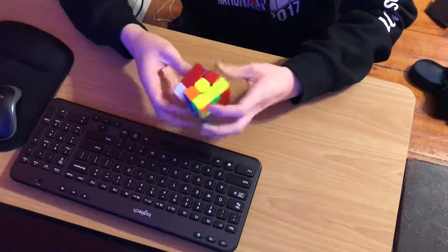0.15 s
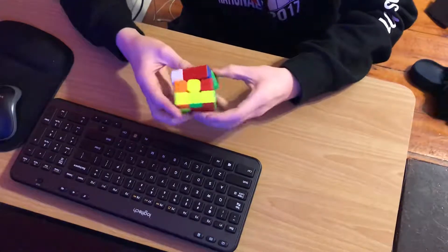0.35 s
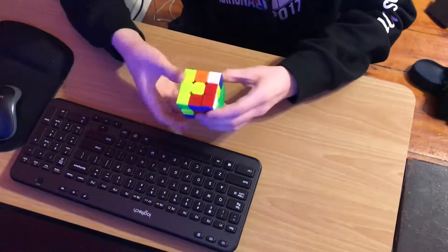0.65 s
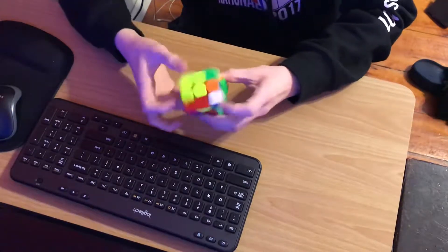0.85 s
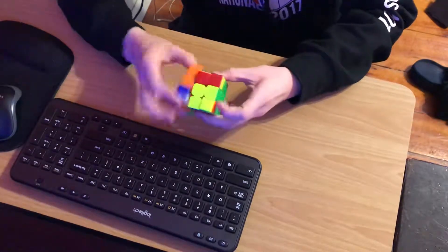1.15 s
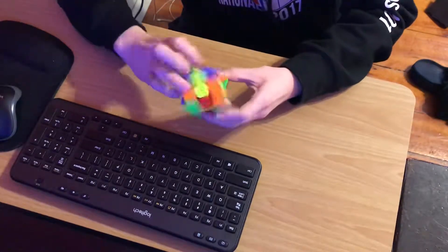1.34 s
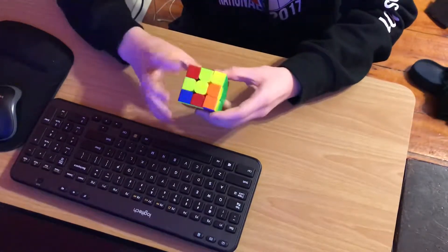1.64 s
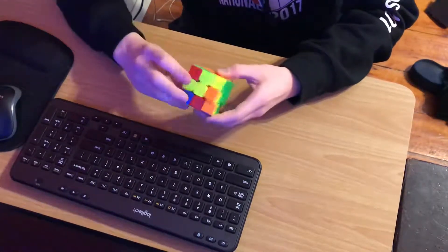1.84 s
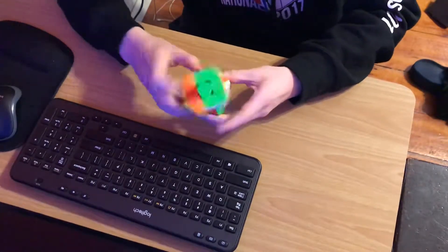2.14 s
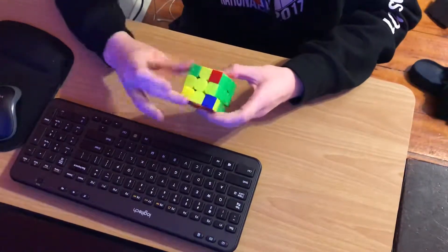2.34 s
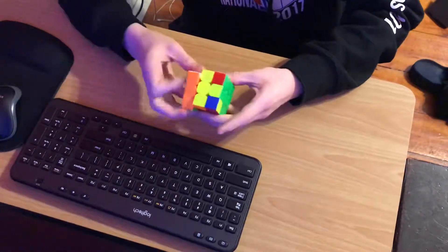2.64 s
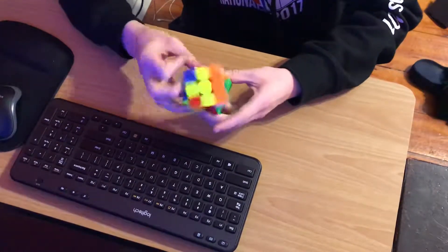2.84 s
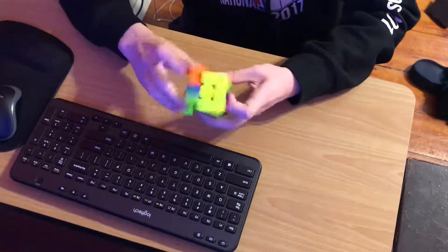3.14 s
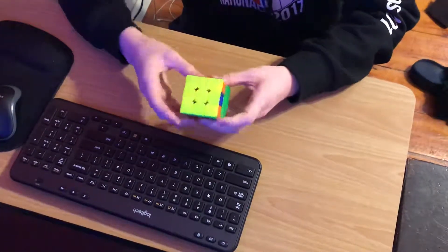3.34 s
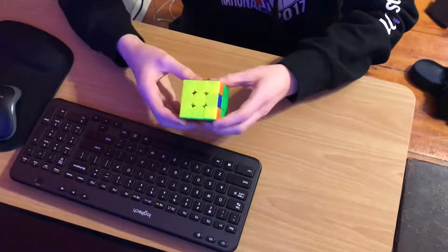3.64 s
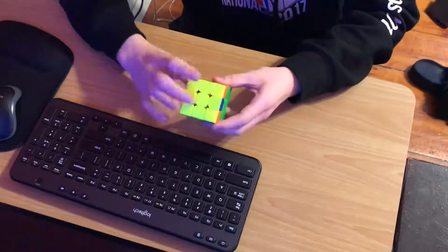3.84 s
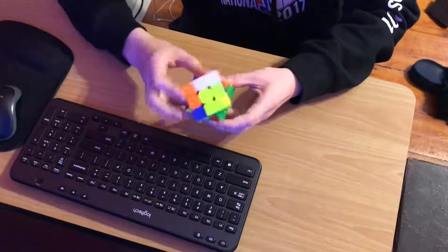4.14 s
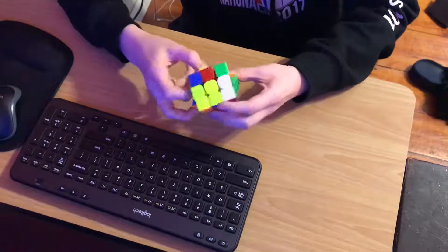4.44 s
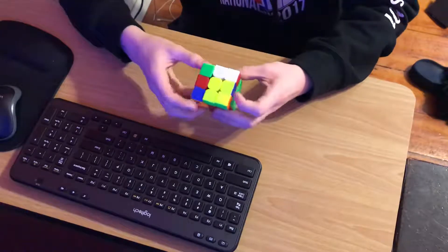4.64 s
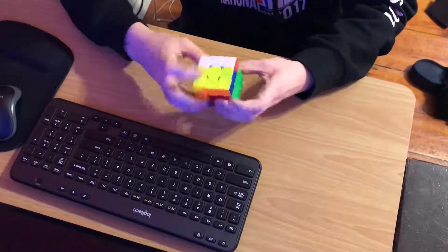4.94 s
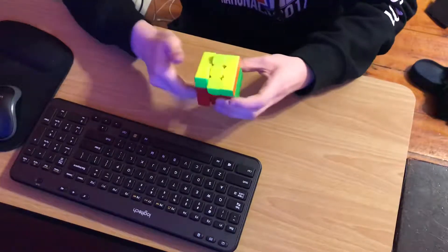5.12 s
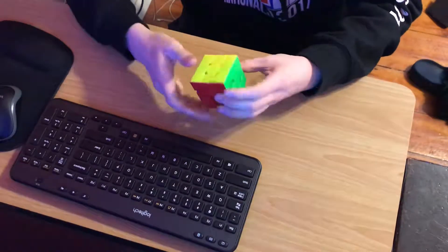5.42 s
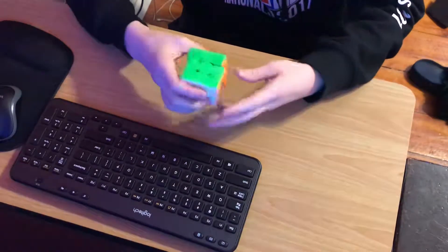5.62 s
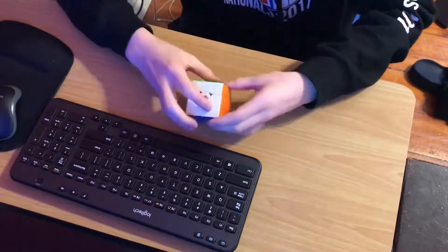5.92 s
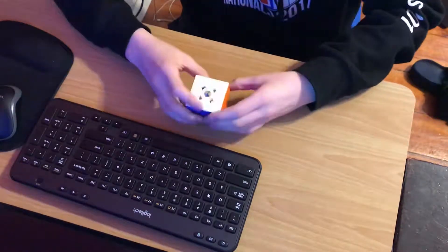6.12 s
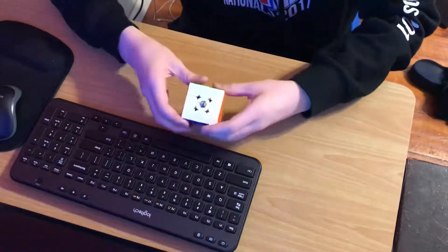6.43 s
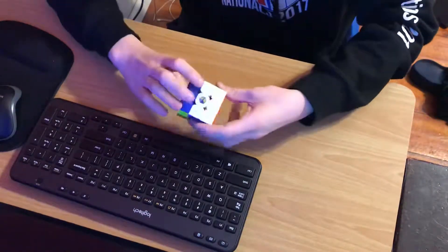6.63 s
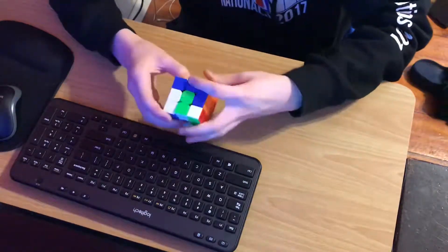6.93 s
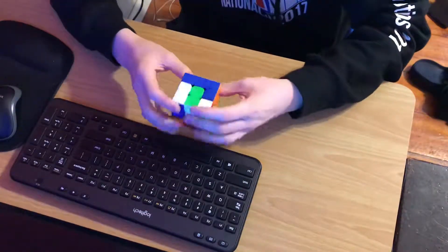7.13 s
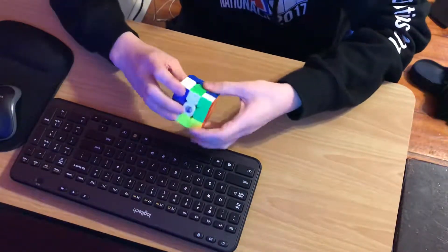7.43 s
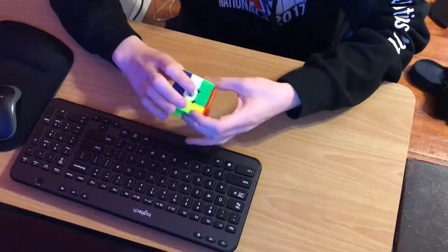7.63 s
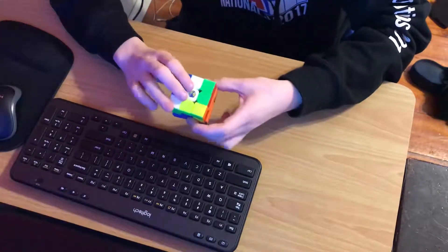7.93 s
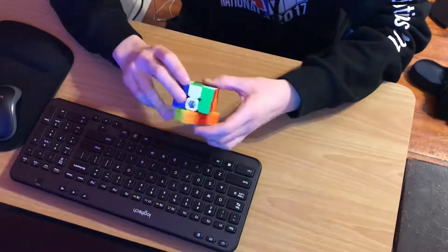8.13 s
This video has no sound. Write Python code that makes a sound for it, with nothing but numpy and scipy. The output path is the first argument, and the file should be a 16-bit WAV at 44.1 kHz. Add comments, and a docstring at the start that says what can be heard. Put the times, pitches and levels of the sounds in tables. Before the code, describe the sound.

Hands twist a plastic puzzle cube fast, its hollow pieces clicking and rattling in bright bursts as the layers slide. After about five seconds the cube knocks on a wooden desk twice with a ringing thud, the second time harder. Lighter, sparser clicks follow. The sound is close, in a small quiet room with a faint hum, rumble and hiss.

```python
"""Puzzle cube over a desk

Hands twist a plastic cube fast in a small quiet room, over a faint hum, rumble and hiss.
Its hollow pieces ring in short clacks and rattle as the layers slide, faintly shaking the wooden desk.
Wrists bump the desk softly, stirring its low modes; twice the cube knocks on it with a ringing thud."""
import sys
import numpy as np
from scipy import signal
from scipy.fft import rfft, irfft, next_fast_len
from scipy.io import wavfile
from scipy.ndimage import uniform_filter1d

SR = 44100
rng = np.random.default_rng(int(sys.argv[2]) if len(sys.argv) > 2 else 0)


def persist_wave(psi):
    """Save psi, clipped to +-1, as 16-bit WAV."""
    counts = np.round(np.clip(psi, -1, 1) * 32767).astype(np.int16)
    wavfile.write(sys.argv[1], SR, np.atleast_2d(counts).T)


N = 364707

# tone of the rumble: freq_hz, gain_db
RUMBLE_SPECTRUM = [(35, -12), (60, 2.5), (100, -9.5), (135, -7.5), (175, -11), (320, -11), (400, -13.5),
                   (2000, -30)]
# rounded swells of the hum: centre_s, half_span_s, peak_db
HUM_SWELLS = [(.03, 0.12, -72), (0.403, 0.14, -58), (.7, 0.27, -68.5), (1.177, 0.16, -63), (1.35, .14, -60),
              (1.87, .2, -71.5), (2.305, 0.15, -67), (4.24, 0.11, -65), (4.58, 0.24, -71),
              (5.858, .36, -66.5), (6.449, .5, -63), (7.184, .18, -60), (7.42, 0.14, -58),
              (7.885, 0.13, -64), (8.194, 0.2, -62)]
# tone of the hiss: freq_hz, gain_db
HISS_SPECTRUM = [(300, -15), (1000, 4.5), (3000, 0.5), (5500, 0), (7500, -4.5), (9000, 0.5), (10500, -7),
                 (15500, -2.5)]
# where the hiss rests between lifts: time_s, level_db
HISS_FLOOR = [(0, -67), (2.1, -68.5), (2.8, -74), (4.4, -80), (5.9, -68.5), (7.1, -68.5), (8.1, -74.5)]
# piece striking piece: start_s, strength_db
STRIKES = [(0.023, -28), (0.0476, -26.5), (0.0733, -15.5), (0.0891, -11.5), (0.1338, -18), (0.2753, -41),
           (0.5531, -32), (0.5811, -18), (0.605, -22.5), (0.7517, -39), (0.7905, -35.5), (0.7998, -27),
           (0.8243, -17), (0.8492, -23.5), (0.858, -19.5), (0.8714, -23), (0.8858, -9.5), (0.9345, -13),
           (0.9608, -12), (0.9767, -7.5), (1.1175, -37.5), (1.1403, -26), (1.155, -13.5), (1.1695, -22.5),
           (1.2253, -27.5), (1.248, -19.5), (1.2737, -17), (1.288, -16), (1.3074, -12), (1.324, -15.5),
           (1.359, -22.5), (1.3759, -14.5), (1.3968, -11.5), (1.4217, -16), (1.4303, -17.5), (1.452, -13.5),
           (1.4576, -11), (1.5202, -30.5), (1.5302, -19), (1.5616, -27.5), (1.5968, -13.5), (1.621, -19.5),
           (1.6323, -20.5), (1.955, -37.5), (1.974, -30), (1.99, -31.5), (2.105, -49.5), (2.155, -26),
           (2.1825, -27.5), (2.2081, -27.5), (2.2422, -9.5), (2.2746, -11), (2.3202, -16), (2.3591, -22),
           (2.366, -11.5), (2.38, -20), (2.5484, -29.5), (2.5743, -35), (2.5905, -28), (2.6255, -22.5),
           (2.6642, -35.5), (2.7458, -45), (2.8804, -30.5), (2.891, -13.5), (2.9142, -23), (2.927, -17),
           (2.9515, -11.5), (2.9739, -19), (3.0194, -18), (3.0364, -11.5), (3.1083, -23.5), (3.1282, -25.5),
           (3.1804, -29), (3.2123, -8.5), (3.2201, -11.5), (3.2283, -7.5), (3.256, -9), (3.9554, -36),
           (3.973, -27), (3.9902, -22.5), (4.0225, -38), (4.0494, -19), (4.1852, -22.5), (4.215, -17),
           (4.2431, -28.5), (4.2929, -31.5), (4.3288, -37), (4.3574, -37), (4.4415, -46), (4.467, -35),
           (4.4866, -27), (4.499, -34), (4.5538, -42.5), (4.5721, -15), (4.5776, -15), (4.7126, -22.5),
           (4.7938, -35), (4.8258, -30.5), (4.8602, -34), (4.8808, -20.5), (4.9289, -7.5), (4.9568, -25.5),
           (5.0192, -19), (5.09, -24.5), (5.102, -5.5), (5.1324, -13), (5.2882, -20), (5.2932, -9),
           (5.317, -13), (5.3647, -31), (5.769, -40.5), (6.0511, -22), (6.0587, -3), (6.0812, -17.5),
           (6.55, -45), (6.5798, -31), (6.602, -24), (6.6778, -35), (6.6989, -24), (6.7504, -29),
           (6.7725, -24.5), (6.8826, -35), (6.8885, -26.5), (6.9059, -19), (6.9478, -34), (6.9659, -24),
           (7.0873, -50.5), (7.1841, -42), (7.214, -24), (7.2336, -31), (7.268, -34), (7.2873, -16.5),
           (7.5325, -45), (7.713, -50.5), (7.7777, -29), (7.7957, -30), (7.849, -39.5), (7.8659, -34),
           (7.876, -24), (8.15, -46.5), (8.1981, -26), (8.2282, -17)]
# hollow body of a piece: pitch_hz, width_hz, gain_db
DULL_RESONANCES = [(1100, 810, -4.5), (1486, 220, 2), (1930, 700, -5.5), (3300, 1700, -5.5)]
# bright snap of a piece: pitch_hz, width_hz, gain_db
BRIGHT_RESONANCES = [(4340, 240, -17), (5508, 610, 12), (6910, 1700, 1.5), (8880, 810, 6.5),
                     (9600, 590, -1.5), (11540, 1700, -6), (13700, 25000, -5)]
# slow drift of body against snap for a medium strike: time_s, dullness_db
DULLNESS_DRIFT = [(0, -13.5), (1.45, -12), (2, -6.5), (3.1, -11.5), (4.2, -6), (5.3, -12), (6.6, -2),
                  (8.27, -9.5)]
# the desk and things on it, struck at two spots: pitch_hz, spot_0_db, spot_1_db, t60_s
DESK_MODES = [(55, -4, -9, .5), (134, -8, -8, .33), (147, -2, -14, .3), (205, -7, -8, .2),
              (314, -13, 1, .2), (451, -19, -6, .2), (578, -18, -3, .15), (720, -20, -10, .2),
              (942, -50, -24, .86), (1007, -21, -50, .9)]
# decay of the room by band: freq_hz, t60_s
ROOM_DECAY = [(300, 0.48), (1300, .2), (3500, 0.29), (9000, 0.19), (15000, 0.21)]
# wrists landing on the desk: start_s, blow_db, spot (0 or 1)
WRIST_BUMPS = [(2.358, -40, 1), (7.269, -52, 0), (7.541, -46, 0), (7.89, -45, 0)]
# cube meeting the desk, in two clusters: start_s, blow_db, spot (0 or 1)
CUBE_KNOCKS = [(5.292, -26, 0), (5.361, -39, 0), (6.052, -23, 1), (6.060, -18, 1), (6.082, -35, 1)]
# dense upper modes of the desk top: freq_hz, gain_db
THUD_SPECTRUM = [(300, 2.5), (1200, 2), (2150, 5), (3300, -4), (5000, -26.5)]


def amp(db):
    return 10 ** (np.asarray(db) / 20)


def unit_rms(x):
    return x / np.sqrt(np.mean(x ** 2) + 1e-20)


def curve_at(points, hz):
    """Read a curve along a log frequency axis."""
    point_hz, value = np.transpose(points)
    return np.interp(np.log(hz + 1), np.log(point_hz + 1), value)


def add(mix, start_s, sound):
    part = mix[..., max(round(start_s * SR), 0):][..., :sound.shape[-1]]
    part += sound[..., :part.shape[-1]]


def coloured_noise(spectrum):
    """Steady noise with the given tone, rms 1."""
    size = next_fast_len(N, True)
    gain = amp(curve_at(spectrum, np.fft.rfftfreq(size, 1 / SR)))
    return unit_rms(irfft(rfft(rng.standard_normal(size)) * gain, size)[:N])


def wander(top_hz):
    """Slow random drift, rms 1."""
    t = np.arange(0, N, 256) / SR
    sines = sum(np.sin(2 * np.pi * (hz * t + rng.random())) for hz in np.geomspace(top_hz / 12, top_hz, 24))
    return np.interp(np.arange(N) / SR, t, unit_rms(sines))


def rumble(clatter):
    """A low bed that grows with the clatter as the arms shake the desk."""
    activity = unit_rms(np.sqrt(abs(uniform_filter1d(abs(clatter), SR // 5))))
    return amp(-63.5 + 2.1 * activity) * coloured_noise(RUMBLE_SPECTRUM)


def hum(pitch_hz=213, bend_hz=18):
    """A faint wavering tone; each swell starts flat and bends up to pitch."""
    level, flat_hz = np.full(N, amp(-75.5)), np.zeros(N)
    for centre_s, half_span_s, peak_db in HUM_SWELLS:
        position = np.linspace(-1, 1, round(half_span_s * 2 * SR))
        add(level, centre_s - half_span_s, amp(peak_db) * np.exp(-(2.5 * position) ** 2))
        add(flat_hz, centre_s - half_span_s, bend_hz * np.exp(-((position + 0.32) / 0.23) ** 2))
    cycles = np.cumsum(pitch_hz - flat_hz + 6 * wander(6) + 9 * wander(40)) / SR
    return level * amp(2.5 * wander(8)) * np.sqrt(2) * np.sin(2 * np.pi * cycles)


def hiss(hard_db=-16.2, lifted_db=-61.5, hold_s=0.407):
    """Faint hiss that jumps up and holds for a moment after each hard strike."""
    level_db = np.interp(np.arange(N) / SR, *np.transpose(HISS_FLOOR))
    for start_s, strength_db in STRIKES:
        if strength_db > hard_db:
            level_db[round(start_s * SR):round((start_s + hold_s) * SR)] = lifted_db
    return amp(uniform_filter1d(level_db, 400)) * coloured_noise(HISS_SPECTRUM)


def shell(modes, size, spread_db, detune):
    """Spectrum of one hollow piece: each weights and tunes the modes a little differently."""
    hz = np.fft.rfftfreq(size, 1 / SR)
    pitch_hz, width_hz, gain_db = np.transpose(modes)[:, :, None]
    gain_luck, pitch_luck = rng.standard_normal((2, len(modes), 1))
    tuned_hz = pitch_hz * (1 + detune * pitch_luck)
    peaks = amp(gain_db + spread_db * gain_luck) / (1 + 2j * (hz - tuned_hz) / width_hz)
    return peaks.sum(0) * (1j * hz / (1j * hz + 950)) ** 3  # too small to radiate bass


def clack(dull_db, low_mode_ratio=1, size=1024):
    """A few ms of chattering contact ring the pieces; rows: toward the microphone, all round."""
    t = np.arange(size) / SR
    decay_s = .0032 * np.exp(.2 * rng.standard_normal())
    contact = np.minimum(t / 0.001, 1) ** 1.8 * np.exp(-t / decay_s)
    chatter = rfft(contact * rng.standard_normal((2, size)))
    dull = shell(np.multiply(DULL_RESONANCES, [low_mode_ratio, 1, 1]), size, spread_db=3, detune=.05)
    bright = shell(BRIGHT_RESONANCES, size, spread_db=3, detune=.03)
    dull *= amp(dull_db + 1) / np.linalg.norm(dull)
    bright /= np.linalg.norm(bright)
    direct = irfft(chatter[0] * dull + chatter[1] * bright)
    direct /= direct[20:110].std()  # the attack sets the level
    all_round = irfft(dull + bright)  # the chatter's notches average out over directions
    return np.array([direct, all_round * np.linalg.norm(direct) / np.linalg.norm(all_round)])


def clacks(medium_db=-20, on_desk_db=20):
    """Pieces collide, brighter when hit harder; against the desk their dull modes ring louder and higher."""
    out = np.zeros((2, N))
    start_s, strength_db = np.transpose(STRIKES)
    on_desk = abs(start_s[:, None] - np.transpose(CUBE_KNOCKS)[0]).min(1) < .005
    chance_db = 6 * rng.standard_normal(len(start_s))
    dull_db = np.interp(start_s, *np.transpose(DULLNESS_DRIFT)) - .5 * (strength_db - medium_db)
    dull_db += np.where(on_desk, on_desk_db, chance_db)
    for k in range(len(start_s)):
        hit = clack(dull_db[k], low_mode_ratio=1.6 if on_desk[k] else 1)
        add(out, start_s[k], amp(strength_db[k] - 5) * hit)
    return out


def sliding(between_s, lead_s):
    """Envelope of a layer moving between close strikes and just before each one."""
    start_s, strength_db = np.transpose(STRIKES)
    t = np.arange(0, N, 32) / SR
    since_s = t[:, None] - start_s
    after = (amp(strength_db) * np.exp(-abs(since_s) / between_s) * (since_s >= 0)).max(1)
    before = (amp(strength_db) * np.exp(-abs(since_s) / between_s) * (since_s < 0)).max(1)
    lead_in = (amp(strength_db) * np.exp(-abs(since_s) / lead_s) * (since_s < 0)).max(1)
    motion = np.minimum(after, before) + .4 * np.minimum(lead_in, 10 * after)
    return np.interp(np.arange(N) / SR, t, motion)


def rattle(ticks_per_s=300, pieces=8):
    """Loose pieces tick at random over a scrape while a layer slides."""
    strength = amp(3.5 * np.minimum(rng.exponential(1, N), 4))
    taps = strength * (rng.random(N) < ticks_per_s / SR)
    piece = rng.integers(0, pieces, N)
    ticks = sum(signal.oaconvolve(taps * (piece == k), clack(dull_db=-6)[0])[:N] for k in range(pieces))
    body = irfft(shell(DULL_RESONANCES + BRIGHT_RESONANCES, 1024, spread_db=0, detune=0))
    scrape = signal.oaconvolve(rng.standard_normal(N), body)[:N]
    texture = unit_rms(ticks) + 0.41 * unit_rms(scrape)
    return amp(-15.5) * sliding(between_s=0.028, lead_s=0.0061) * texture


def shaken_desk():
    """Every strike in the hand rings the desk a little, damped by the arms."""
    jolts, t = np.zeros(N), np.arange(SR // 2) / SR
    start_s, strength_db = np.transpose(STRIKES)
    jolts[np.round(start_s * SR).astype(int)] = amp(strength_db - 42) * rng.standard_normal(len(start_s))
    ring = sum(amp(gain_db - 90 * t / t60_s) * np.sin(2 * np.pi * hz * t)
               for hz, _, gain_db, t60_s in DESK_MODES)
    return signal.oaconvolve(jolts, ring)[:N]


def wall_echo(sound, delay_s=.0098, gain_db=-12):
    """A wall throws back one clear slap."""
    echo = np.zeros(N)
    add(echo, delay_s, amp(gain_db) * sound)
    return echo


def room(sound, crossfade_hz=4.3):
    """Sparse reflections, each band dying at its own speed; three tails crossfade steadily for smoothness."""
    out, phase = np.zeros(N), 2 * np.pi * crossfade_hz * np.arange(N) / SR
    for k in range(3):
        taps = np.zeros(SR // 2)
        slots = np.arange(150, SR // 2 - 10, 10)
        taps[slots + rng.integers(0, 10, len(slots))] = rng.choice([-1., 1.], len(slots))
        hz, t, bands = signal.stft(taps, SR, nperseg=256)
        decay = amp(-60 * t / curve_at(ROOM_DECAY, hz)[:, None])
        tail = signal.istft(bands * decay, SR, nperseg=256)[1]
        send = np.sqrt(2 / 3) * np.cos(phase + k * np.pi / 3)
        out += signal.fftconvolve(sound * send, tail / np.linalg.norm(tail))[:N]
    return out


def wrist_bumps(attack_s=0.028, cutoff_hz=170):
    """A soft blow builds slowly and reaches only the desk's low modes."""
    out, t = np.zeros(N), np.arange(SR) / SR
    for start_s, blow_db, spot in WRIST_BUMPS:
        ring = sum(amp(spot_db[spot] - 60 * t / t60_s) * np.sin(2 * np.pi * hz * t)
                   / (1 + (hz / cutoff_hz) ** 4) for hz, *spot_db, t60_s in DESK_MODES)
        add(out, start_s, amp(blow_db) * np.minimum(t / attack_s, 1) * ring)
    return out


def cube_knocks(attack_s=0.0045, thud_t60_s=0.13):
    """The cube rings the desk's modes, weighted by the spot struck, over a short noisy thud."""
    rings, thuds, t = np.zeros(N), np.zeros(N), np.arange(SR) / SR
    for start_s, blow_db, spot in CUBE_KNOCKS:
        blow = amp(blow_db) * np.minimum(t / attack_s, 1)
        ring = sum(amp(spot_db[spot] - 60 * t / t60_s) * np.cos(2 * np.pi * hz * t)
                   for hz, *spot_db, t60_s in DESK_MODES)
        add(rings, start_s, blow * ring)
        add(thuds, start_s, blow * amp(-60 * t / thud_t60_s) * coloured_noise(THUD_SPECTRUM)[:SR])
    return rings, thuds


def scene():
    """Mono mix of cube, desk and bed; only the clatter and thuds feed the reflections."""
    clatter, all_round = clacks() + rattle()
    rings, thuds = cube_knocks()
    reflections = wall_echo(clatter + thuds) + amp(-7.5) * room(all_round + thuds)
    desk = shaken_desk() + wrist_bumps() + rings + thuds
    bed = rumble(clatter) + hum() + hiss()
    return (clatter + desk + reflections + bed)[None]


def record(dry, low_cut_hz=38, high_cut_hz=15900):
    """The microphone drops the deepest bass; a steep filter trims the very top."""
    thinned = signal.sosfilt(signal.butter(3, low_cut_hz, "high", fs=SR, output="sos"), dry)
    lowpass = signal.firwin(255, high_cut_hz, window=("kaiser", 9), fs=SR)
    return signal.oaconvolve(thinned, lowpass[None], "same")


dry = scene()
out = record(dry)
persist_wave(out)
```